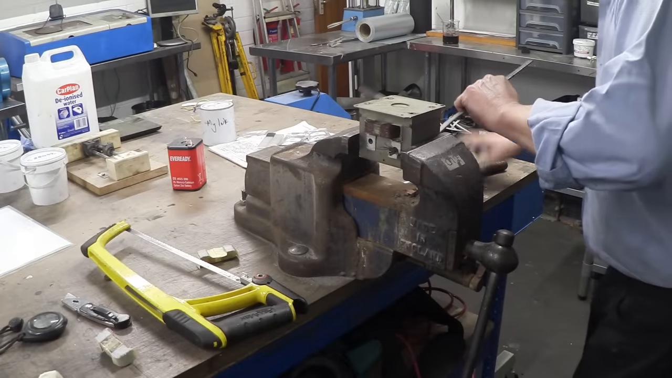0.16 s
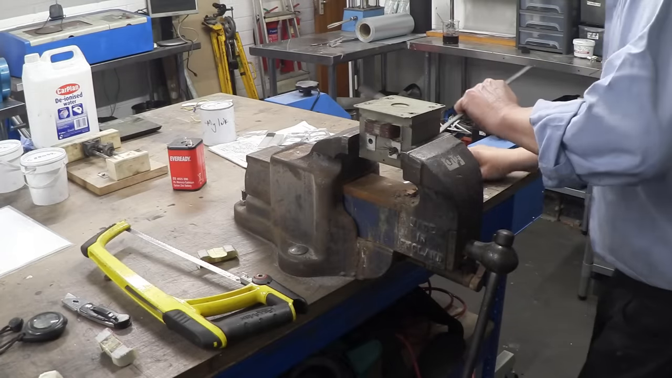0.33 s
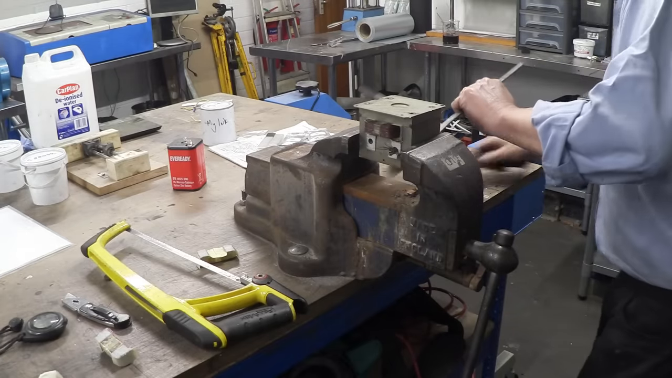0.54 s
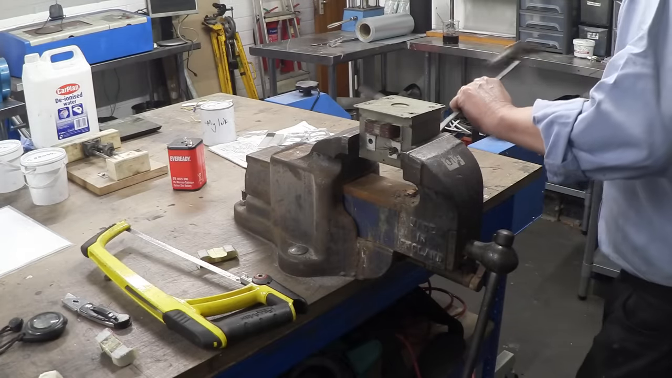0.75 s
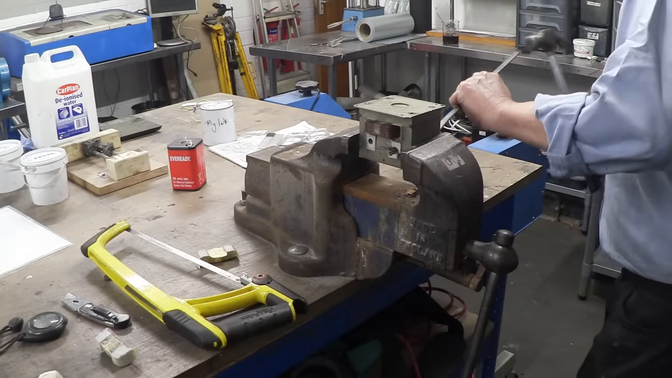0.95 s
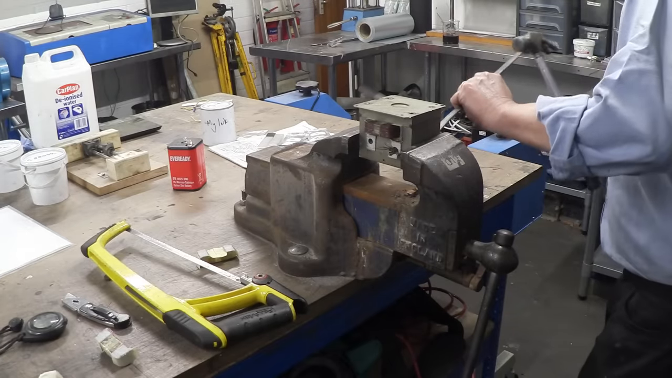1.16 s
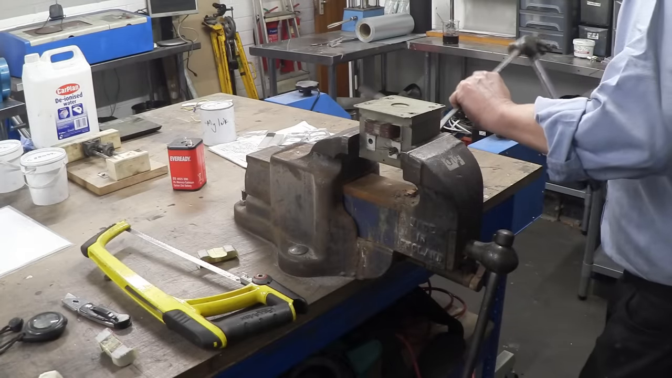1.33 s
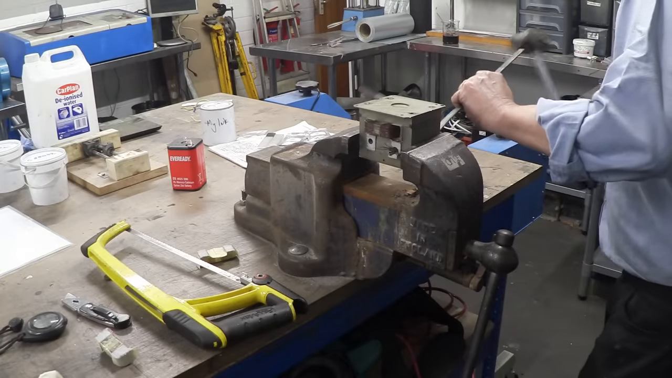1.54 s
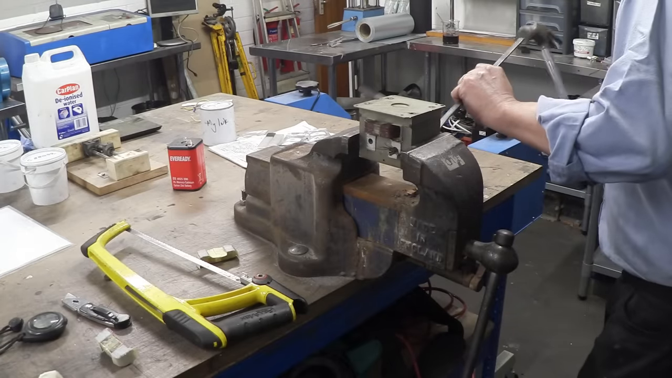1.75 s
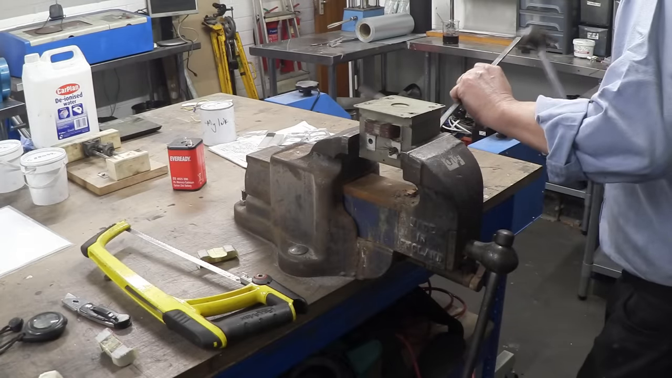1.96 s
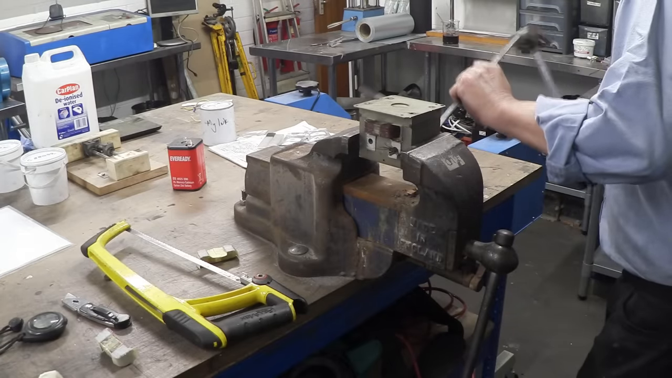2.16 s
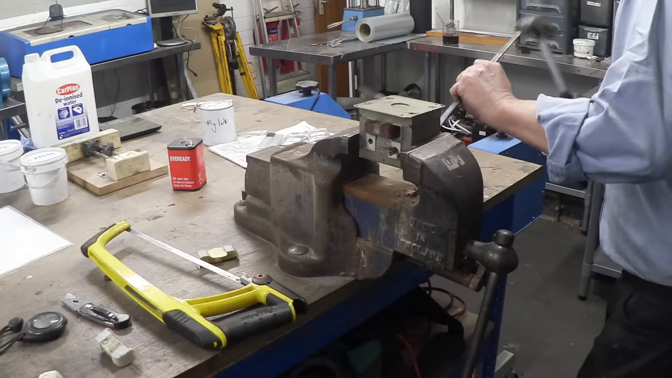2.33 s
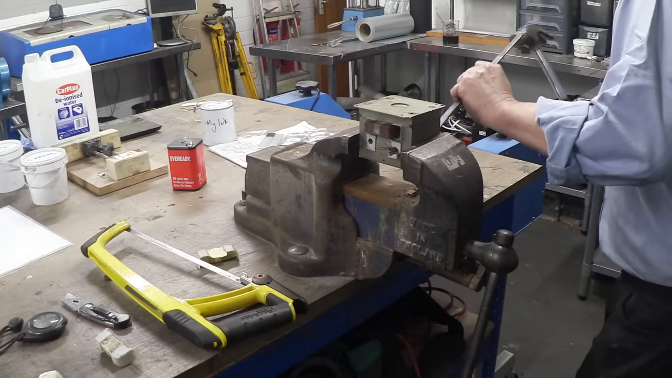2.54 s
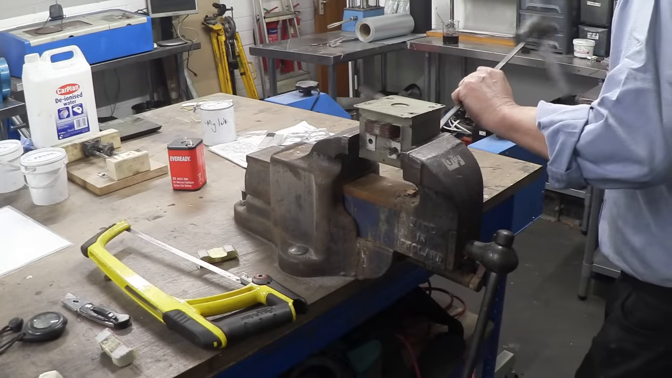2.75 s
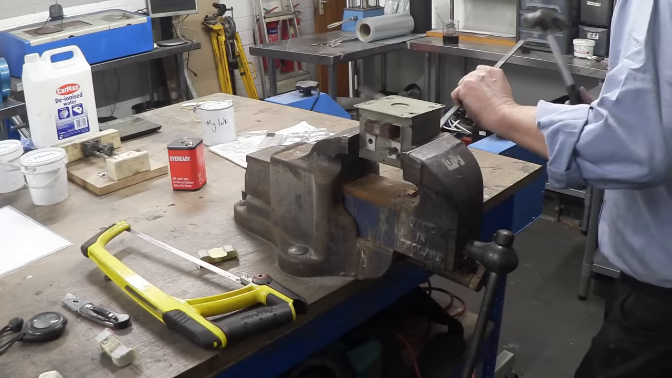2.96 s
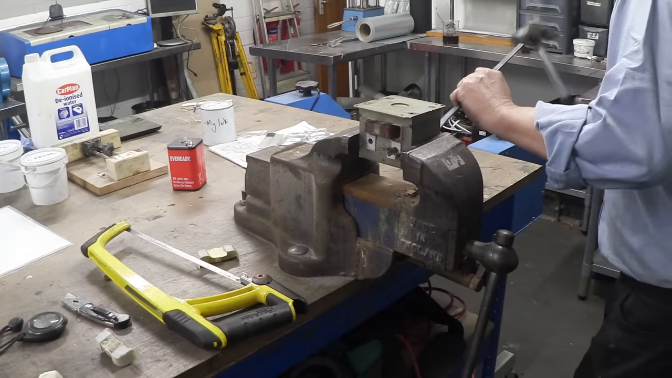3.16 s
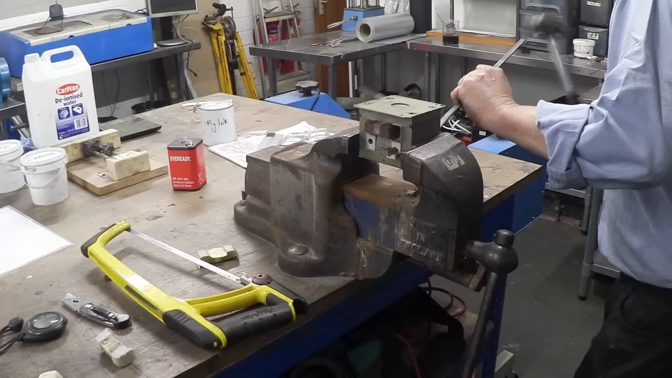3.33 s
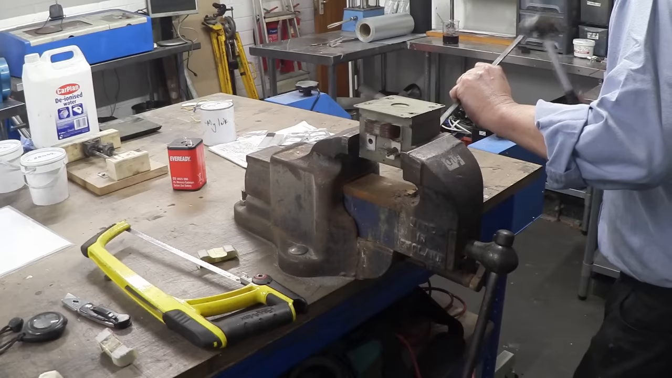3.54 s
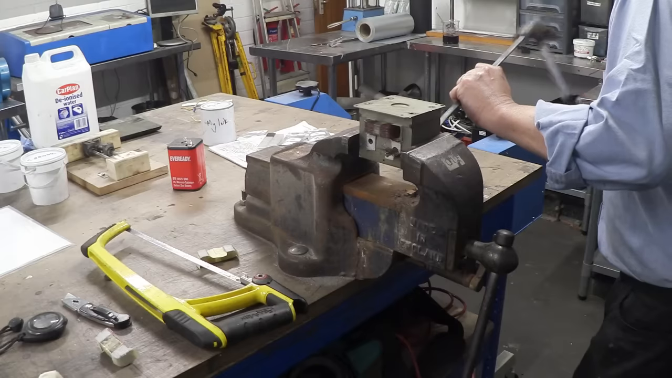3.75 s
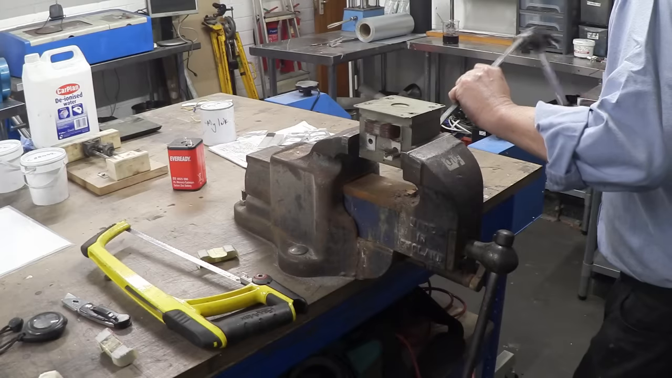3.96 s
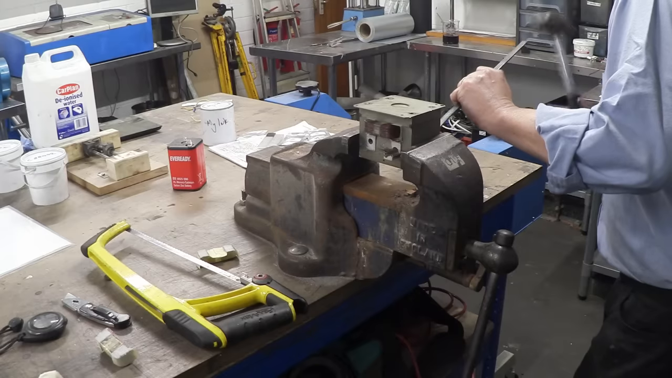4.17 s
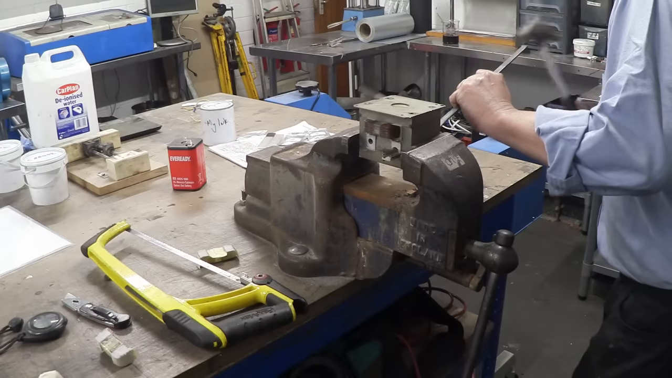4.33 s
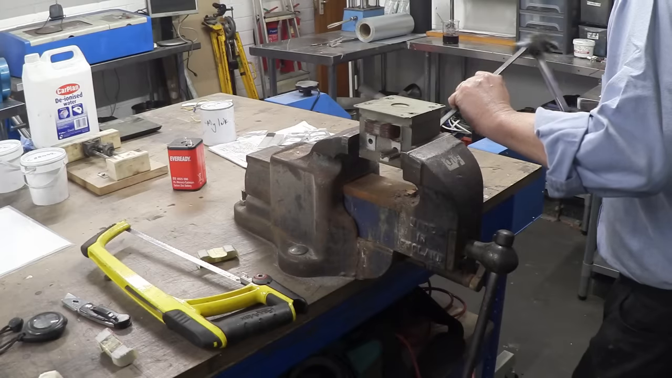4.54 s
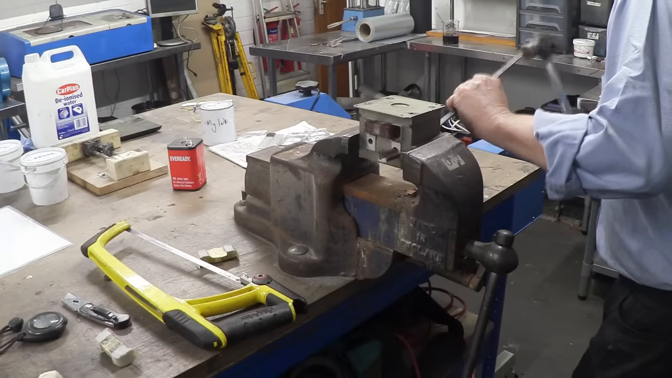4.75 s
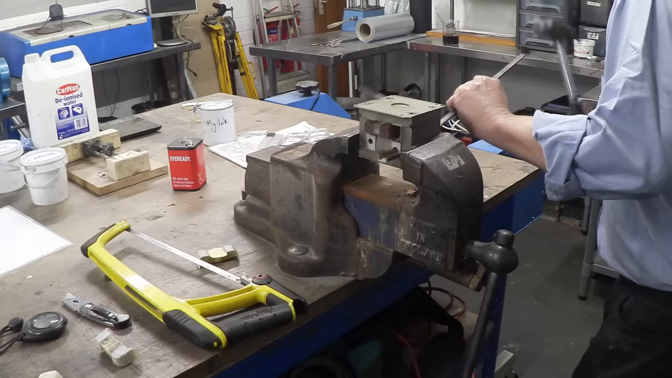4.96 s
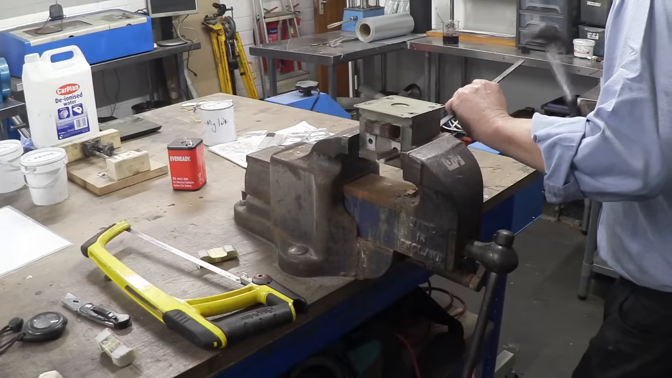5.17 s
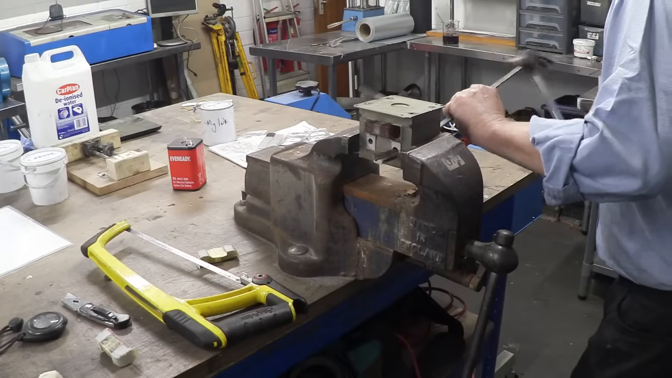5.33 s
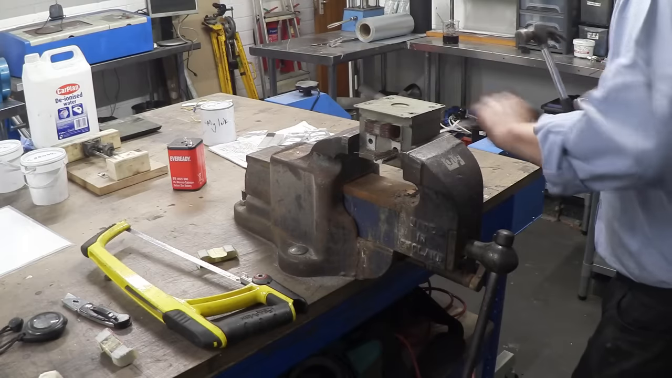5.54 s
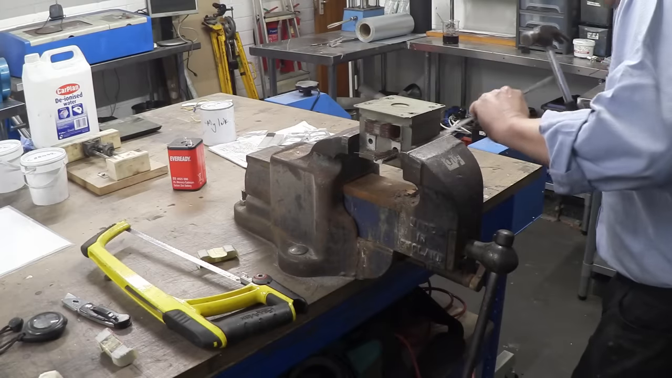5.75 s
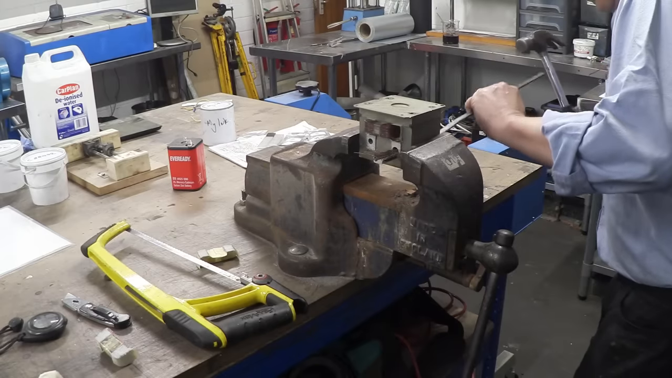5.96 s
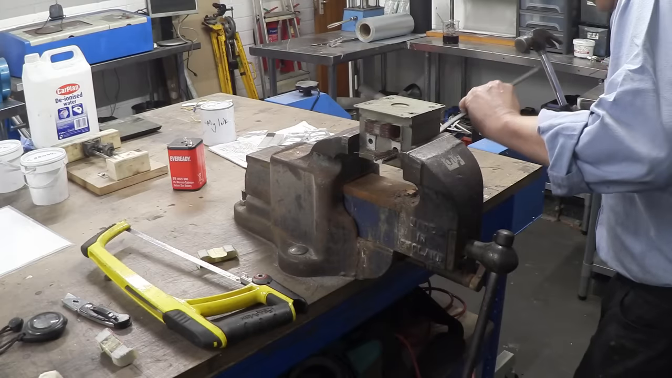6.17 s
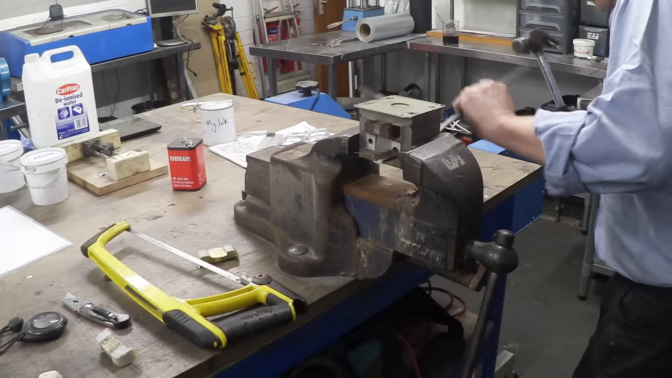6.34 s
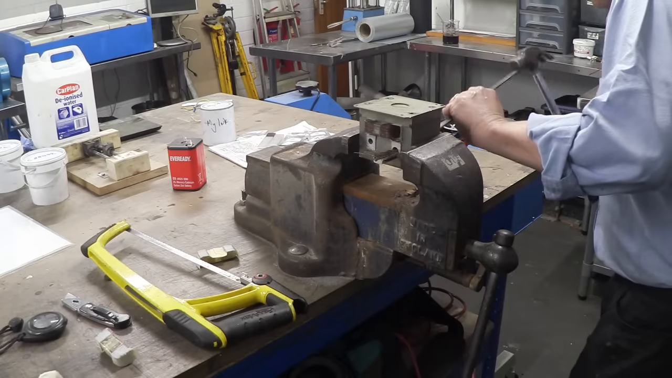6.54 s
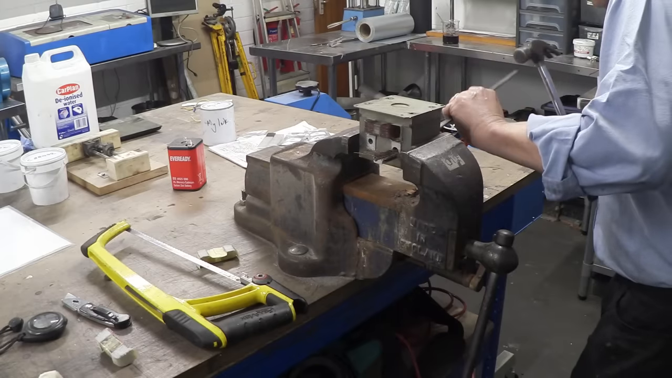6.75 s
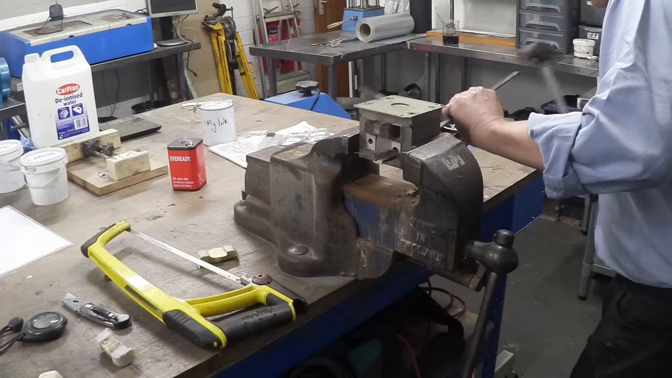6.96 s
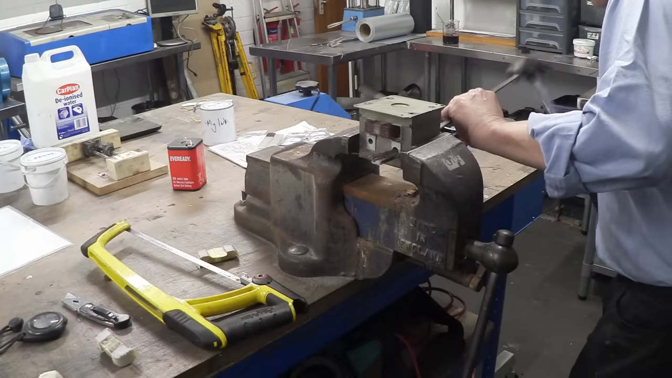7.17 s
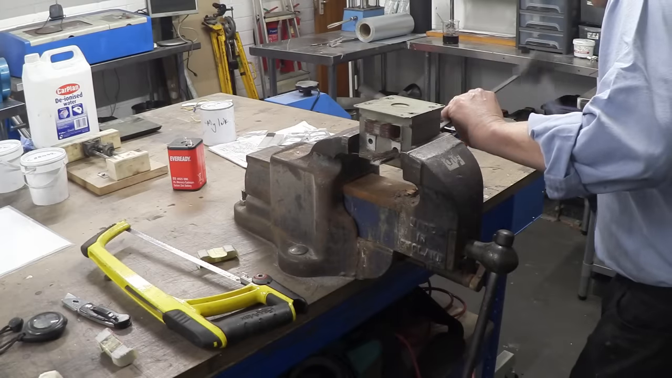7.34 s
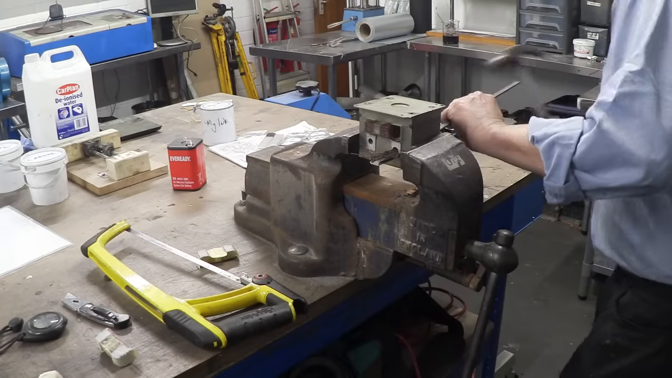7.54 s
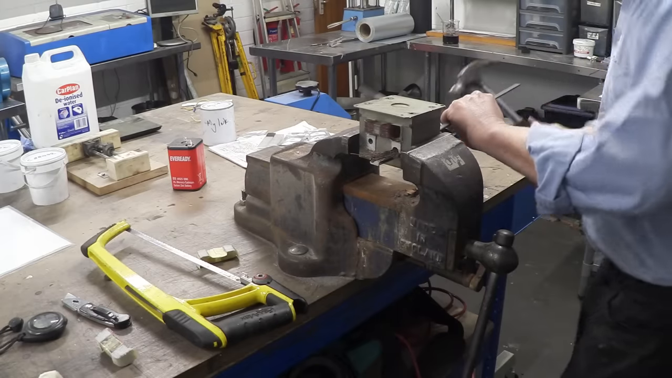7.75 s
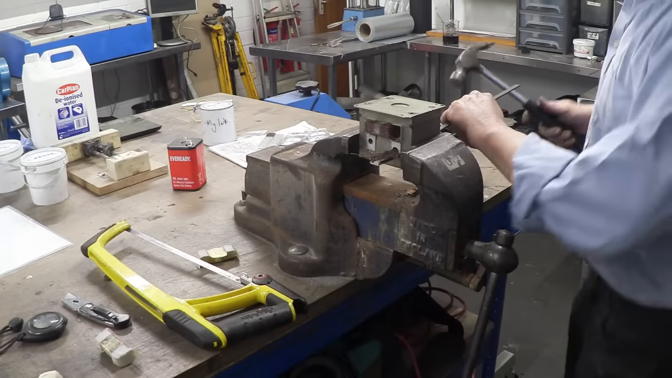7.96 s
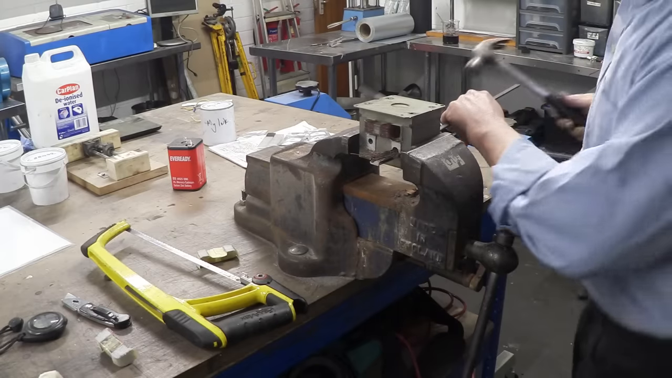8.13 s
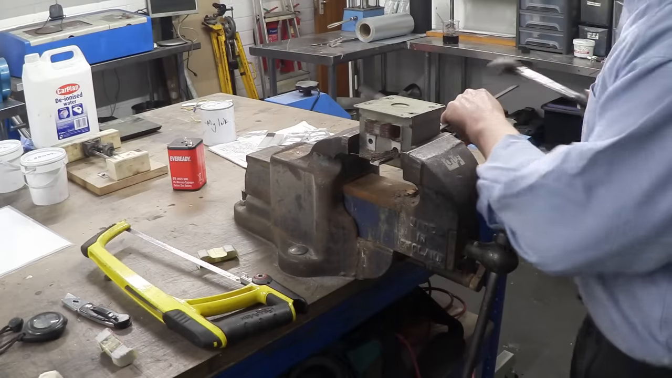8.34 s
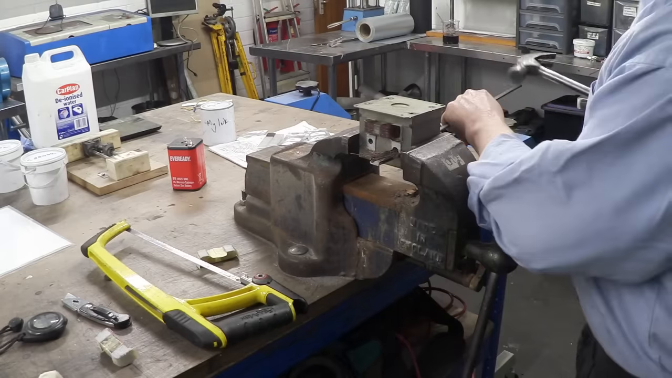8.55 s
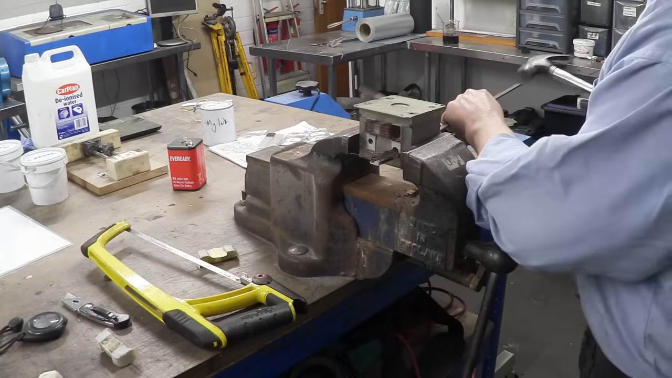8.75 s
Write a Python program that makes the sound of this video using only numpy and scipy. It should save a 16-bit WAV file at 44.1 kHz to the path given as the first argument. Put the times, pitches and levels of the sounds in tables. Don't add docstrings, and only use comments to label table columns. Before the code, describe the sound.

Close stereo sound, about a metre from a bench vice, with short room reflections and soft airy hum. Brief gritty drag and light aiming taps lead into a run of evenly spaced hammer cracks on steel, short choked rings with a dull wooden-metal thud beneath, growing louder and then holding. The run stops for small ticks and nudges; one lighter tap and three final whacks follow, then metal scraping, clicks and cloth rustling.

```python
import sys
import numpy as np
from scipy import signal
from scipy.fft import rfft, irfft
from scipy.io import wavfile
from scipy.ndimage import uniform_filter1d

SR = 44100
rng = np.random.default_rng(int(sys.argv[2]) if len(sys.argv) > 2 else 0)


def transcribe(u):
    v = np.clip(np.atleast_2d(u).T, -1, 1)
    q = np.round(v * 32767).astype(np.int16)
    wavfile.write(sys.argv[1], SR, q)


def level_to_linear(level):
    exponent = np.asarray(level, float) / 20
    return 10 ** exponent


N = 388080


def on_log(table, hz, column=1):
    table = np.array(table, float)
    return np.interp(np.log(np.maximum(hz, 1)), np.log(table[:, 0]), table[:, column])


def noise(size, spectrum):
    gain = level_to_linear(on_log(spectrum, np.fft.rfftfreq(size, 1 / SR)))
    x = irfft(rfft(rng.standard_normal(size)) * gain, size)
    return x / np.sqrt(np.mean(x ** 2))


def resonant_noise(size, power):
    return irfft(rfft(rng.standard_normal(size)) * np.sqrt(power), size)


def fade(t, t60):
    return np.exp(-np.log(1000) * t / np.maximum(t60, .002))


def flicker(rate, size=N):
    k = int(SR / rate)
    held = np.repeat(rng.standard_normal(size // k + 1), k)
    return uniform_filter1d(held, k)[:size]


def add(track, s, sound):
    i = int(s * SR)
    track[i:i + len(sound)] += sound[:N - i]


def played(rows, extra_db=0):
    t = np.arange(N) / SR
    extra_db = extra_db + np.zeros(len(rows))
    gain = 0
    for row, extra in zip(rows, extra_db):
        start, db, swell, fall = row[:4]
        gain = gain + level_to_linear(db + extra - 20 * np.maximum((start - t) / swell, (t - start) / fall))
    return gain


# pitch_hz, level_db (per Hz)
AIR_COLOUR = [(12, -39), (20, -10.5), (75, -7), (257, -4), (581, -12.5), (1430, -17), (11100, -26.5),
              (16400, -47)]
# start_s, level_db
AIR_DRIFT = [(0, 1.5), (1.2, -1.5), (5.5, 0), (6.3, -2), (8.8, 0.5)]


def air():
    drift_db = np.interp(np.arange(N) / SR, *np.transpose(AIR_DRIFT)) + 0.37 * flicker(8.7)
    narrowing = [(40, -24.5), (200, -19), (900, -7.0)]
    side_colour = [(hz, db + on_log(narrowing, hz)) for hz, db in AIR_COLOUR]
    mid = noise(N, AIR_COLOUR)
    side = level_to_linear(-7.5) * np.outer([1, -1], noise(N, side_colour))
    return level_to_linear(-58 + drift_db) * (mid + side)


# pitch_hz, left_right_likeness (0-1)
LIKENESS = [(120, .998), (250, 0.83), (600, 0.93), (1100, 0), (2200, 0.5), (4000, 0.48), (8000, 0.7),
            (15000, .45)]


def spread(mid, side):
    alike = np.clip(on_log(LIKENESS, np.fft.rfftfreq(len(mid), 1 / SR)), 0, 1)
    m = rfft(mid) * np.sqrt((1 + alike) / 2)
    d = rfft(side) * np.sqrt((1 - alike) / 2)
    return irfft([m + d, m - d], len(mid))


# pitch_hz, t60_s, level_db
TAIL_BANDS = [(316, 0.039, -10), (733, 0.35, -5), (1600, 0.26, -8.5), (3830, 0.37, -19),
              (8400, 0.29, -11.5), (14800, 0.19, -7)]
# start_s, level_db (over the tail), width_s
WALLS = [(.0115, 7.5, 0.0028), (.0195, 5, 0.00084), (0.016, 3.5, 0.0011), (.033, 7.5, 0.0047),
         (0.031, 1.5, 0.018)]


def room(dry):
    t = np.arange(SR // 2) / SR
    log_hz = np.log(np.fft.rfftfreq(len(t), 1 / SR) + 1)
    centres = np.log(np.array(TAIL_BANDS)[:, 0])
    tail = 0
    for k, (_, t60, db) in enumerate(TAIL_BANDS):
        share = np.interp(log_hz, centres, np.arange(len(TAIL_BANDS)) == k)
        band = irfft(rfft(rng.standard_normal((2, len(t)))) * np.sqrt(share), len(t))
        tail = tail + level_to_linear(db) * fade(t, t60) * band
    clumps_db = sum(db * np.exp(-((t - s) / width) ** 2) for s, db, width in WALLS)
    build = 1 - np.exp(-(t * 100) ** 2)
    response = spread(*tail) * level_to_linear(-24 + clumps_db) * build
    response[:, 0] += 1
    response[:, 40:43:2] += .28 * np.outer([1, -1], [1, -1])
    return signal.fftconvolve(dry[None], response, axes=1)[:, :N]


# start_s, level_db, swell_s, fade_s
SLEEVE = [
    (8.27, -50.5, 0.042, 0.093),
    (8.39, -47, 0.066, 0.28),
    (8.67, -47.5, 0.099, 0.26),
    (8.765, -45, 0.14, 0.014),
]
# pitch_hz, level_db (per Hz)
CLOTH = [(290, -37), (500, -7), (988, -6), (1060, -12), (1740, -3), (6140, -6), (8830, -7), (16000, -30)]
# start_s, level_db, swell_s, fade_s
FABRIC = [(0.4, -68.5, 1.5, 2.5)]


def rustle():
    cloth = noise(N, CLOTH) * level_to_linear(2.0 * flicker(90) + 1.5 * flicker(600))
    fabric = noise(N, [(8000, -24.5), (12000, 2.0), (16000, -7.0)])
    return played(SLEEVE) * cloth + played(FABRIC) * fabric


# start_s, level_db, swell_s, fade_s, dust_db (over grit)
SCRAPES = [(0.315, -36, 0.0057, 0.026, -17), (0.366, -34, 0.03, 0.034, -16), (0.44, -52, 0.091, 0.15, -5.5),
           (0.53, -55.5, 0.045, 0.14, -11), (0.66, -63, 0.22, 1, -5), (6.494, -45, 0.045, 0.026, -9),
           (6.556, -52.5, 0.027, 0.084, -8), (7.704, -46.5, .07, 0.027, -2), (8.043, -51, .004, 0.055, -8),
           (8.062, -46, 0.027, 0.04, -11), (8.1, -46.5, 0.021, 0.026, -4)]
# pitch_hz, level_db (per Hz)
GRIT = [(600, -21), (1100, -4), (2000, -2), (2800, -1.5), (3300, -2), (4100, -1), (5200, -6.5),
        (16000, -48.5)]
# start_s, level_db, swell_s, fade_s
HUMS = [(0.315, -45, 0.0044, 0.17), (0.45, -42.5, 0.028, 0.24), (0.515, -47.5, 0.11, 0.059),
        (6.53, -54, 0.097, 0.27), (5.6, -58, 0.16, 0.67), (7.64, -59, .03, 0.44), (8.08, -59, .2, 0.29)]


def scrapes():
    grit = noise(N, GRIT) * level_to_linear(4.6 * flicker(400))
    hum = noise(N, [(90, -28.0), (190, -11), (255, -2.0), (320, -18.5), (520, -20), (900, -32.5), (3000, -79)])
    dust = noise(N, [(3500, -19.5), (7000, 1.5), (11500, -8.5), (16000, -22.0)]) * level_to_linear(2.3 * flicker(150))
    dust_db = np.array(SCRAPES)[:, 4]
    return played(SCRAPES) * grit + played(HUMS) * hum + played(SCRAPES, dust_db) * dust


# start_s, level_db, swell_s, fade_s
DRAG = [
    (8.2, -53.5, 0.088, 0.62),
    (8.5, -53.5, 0.37, 0.16),
]
# pitch_hz, width_hz, level_db
DRAG_RINGS = [(824, 50, 3.5), (1400, 48, 1), (1670, 71, -2), (2490, 42, 0.5), (2880, 400, -2),
              (3900, 54, -2)]


def bar_slide():
    f = np.fft.rfftfreq(N, 1 / SR)
    power = sum(level_to_linear(db) ** 2 / (1 + ((f - hz) / width * 2) ** 2) for hz, width, db in DRAG_RINGS)
    drag = resonant_noise(N, power)
    return played(DRAG) * drag / np.std(drag) * level_to_linear(2.3 * flicker(50))


def handling():
    return level_to_linear(-3.0) * (scrapes() + rustle() + bar_slide())


# start_s, level_db, pitch_hz, relative_width
TICKS = [(.351, -42, 2200, .6), (.317, -40, 3000, 1), (0.36, -42, 3280, .3), (.366, -34, 1790, 0.27),
         (.369, -45, 4100, .25), (.372, -47, 2360, .5), (.384, -49, 1800, .4), (.51, -46, 1106, 0.25),
         (0.528, -46, 2460, 0.15), (.537, -47.5, 2490, .3), (1.803, -48, 9000, 0.67),
         (4.742, -32.5, 6950, 0.4), (4.803, -43, 6900, 0.317), (5.652, -51, 9000, 0.41),
         (8.177, -52, 11000, .5), (5.71, -45, 6600, 0.18), (5.848, -45, 6800, 0.12),
         (5.99, -55, 4330, 0.16), (6.496, -44, 3500, 0.36), (6.53, -56, 7300, 0.18),
         (6.55, -55, 7150, 0.06), (5.65, -58, 10700, .05), (8.01, -49, 8100, 0.22),
         (8.042, -46, 2300, 0.53), (8.092, -31.5, 3020, 0.72), (8.099, -32.5, 3240, 0.77),
         (8.105, -34, 3300, 0.71), (8.121, -44, 824, 0.67), (8.311, -43, 6600, 0.22), (8.031, -60, 278, .4),
         (8.06, -44.5, 2100, 0.17), (8.078, -52, 320, 0.5), (8.467, -49.5, 830, 0.51),
         (8.518, -50, 260, 0.44), (8.685, -58, 550, .25), (8.725, -49, 1780, 0.18), (8.757, -42, 6040, 0.6),
         (8.766, -37, 7000, 0.33)]


def ticks():
    out, t = np.zeros(N), np.arange(SR // 8) / SR
    for s, db, hz, width in TICKS:
        step = (1 + width) ** 2
        colour = [(hz / step, -25), (hz, 0), (hz * step, -25), (hz * (1 + width) ** 4, -50)]
        add(out, s, level_to_linear(db) * noise(len(t), colour) * fade(t, 18 / hz / width))
    return out


# pitch_hz, level_db, t60_s
BOARD = [(82.5, -6.5, 0.36), (100.4, -13, 0.47), (159.8, -7, .25), (189, -5, 0.3), (212.1, -4, 0.34),
         (246.5, -8, 0.54), (342.4, -10, 0.16), (384, -8.5, 0.22), (438, -6, 0.38), (457.5, -6, 0.19),
         (491.5, -9, 0.17), (529.8, -4.5, 0.17), (750.5, -13, 0.2), (836, -15.5, 0.19)]


def board(deep_db, knock_db, core_db, t60_share):
    t = np.arange(SR // 2) / SR
    hz, db, t60 = np.transpose(BOARD)[:, :, None]
    blow_db = np.where(hz < 130, deep_db + 8.5, knock_db + core_db * (hz > 600))
    db = db + blow_db + 0.66 * rng.standard_normal(hz.shape)
    build = 1 - np.exp(-t * hz / 2.7)
    return (level_to_linear(db) * fade(t, t60 * t60_share) * build * np.sin(2 * np.pi * hz * t)).sum(axis=0)


# pitch_hz, width_hz, level_db
BENCH = [(81.5, 9.6, -4.5), (100, 32, -6), (151, 39, -7), (204, 120, -5.5), (260, 4.2, -4), (351, 130, -5),
         (402, 41, -6), (455, 66, 0), (524, 24, -5), (690, 93, -19.5), (764, 43, -14), (1030, 46, -17.5)]


def thump(deep_db, knock_db, core_db, t60_share):
    t = np.arange(SR // 2) / SR
    f = np.fft.rfftfreq(len(t), 1 / SR)
    bands = [  # low_hz, high_hz, level_db, t60_s
        (0, 130, deep_db - 5.5, 0.59), (130, 300, knock_db, 0.63),
        (300, 600, knock_db, 0.33), (600, 2000, knock_db + core_db - 10.5, 0.22)]
    thud = 0
    for low_hz, high_hz, db, t60 in bands:
        power = sum(level_to_linear(d) ** 2 / (1 + ((f - hz) / width * 2) ** 4)
                    for hz, width, d in BENCH if low_hz < hz < high_hz)
        rumble = resonant_noise(len(t), power)
        thud = thud + level_to_linear(db) * fade(t, t60_share * t60) * rumble / np.std(rumble[:SR // 14])
    swell = 1 - np.exp(-t / 0.0053)
    return level_to_linear(-10.0) * swell * thud + level_to_linear(-1.5) * board(deep_db, knock_db, core_db, t60_share)


ECHO_S = .0055


def clack(t, sizzle_db):
    colour = [(500, -45), (1500, -16), (4500, 0), (9000, sizzle_db - 4), (13000, sizzle_db - 10), (16000, -22)]
    return noise(len(t), colour) * fade(t, .008)


def ring(hz, db, t60, t, scatter_db):
    split = .035
    chance = rng.standard_normal((len(hz), 3))
    turn = 2 * np.pi * hz[:, None] * t
    lower = np.sin(turn * (1 - split / 2) + chance[:, 1:2])
    upper = np.sin(turn * (1 + split / 2) + chance[:, 2:])
    level = level_to_linear(db - 3.5 + scatter_db * chance[:, 0])[:, None]
    return (level * fade(t, t60[:, None]) * (lower + upper)).sum(axis=0)


RING_REF_HZ = 3000
# pitch_hz, level_db (per Hz)
CRACK = [(180, -47), (320, -14), (1220, -16), (2000, -3), (3760, 0.5), (8120, -11), (12300, -17.5),
         (16400, -58.5)]


def steel(hz, db, colour, t, rise_s):
    t60 = 0.014 * (RING_REF_HZ / hz) ** 0.35
    bar = ring(hz, db, t60, t, scatter_db=1.0)
    clang_width, clang_db, clang_s = .085, -14.5, .11
    f = np.fft.rfftfreq(len(t), 1 / SR)[:, None]
    power = (level_to_linear(db) ** 2 / hz / (1 + ((f / hz - 1) / clang_width * 2) ** 4)).sum(axis=1)
    clang = resonant_noise(len(t), power)
    clang = clang / np.std(clang) * level_to_linear(3.0 * flicker(300, size=len(t))) * fade(t, clang_s)
    hiss = noise(len(t), [(f, d + on_log(colour, f)) for f, d in CRACK])
    crack = fade(t, .018)
    chatter = level_to_linear(5.9 * flicker(700, size=len(t))) * fade(t, 0.25)
    bright = hiss * (level_to_linear(-5.5) * crack + level_to_linear(-23.5) * chatter)
    return (level_to_linear(-4.0) * bar + level_to_linear(clang_db) * clang + bright) * (1 - np.exp(-t / rise_s))


# start_s, level_db, bench_db, rise_s, clack_db
TAPS = [(0.317, -36.5, 2, 0.00036, -9), (1.354, -27, -1, 0.00024, -6), (1.671, -25, -48, 0.0049, -10),
        (1.784, -26.5, -45, 0.00042, 4), (6.669, -24.5, -7, 0.00081, -10), (5.574, -31, -22, 0.0064, -30),
        (6.229, -44, -15, 0.0026, -30), (6.485, -43.5, -3, .012, -28)]
# pitch_hz, level_db
TAP_RINGS = [
    [(1790, 5), (2670, -9), (3110, -18), (4250, -11), (5260, -6)],
    [(1800, 2.5), (2134, 0.5), (2570, 1), (3920, 4), (4250, 3.5), (7650, -3.5), (9300, -4)],
    [(1440, -6), (2250, -4), (3030, -7.5), (3800, -6), (5320, -4), (7380, -15), (9620, -12)],
    [(3030, -17), (4000, 0.5), (4500, -16.5), (4870, 2.5), (5300, -2), (7600, -1), (10280, -2)],
    [(1420, -17), (1894, -2.5), (2580, 4), (2820, -7.5), (3750, -18), (4490, 1), (8400, 1.5), (8900, -2),
     (10800, -7)],
    [(1430, -2), (2250, -5), (2700, -6), (3500, -10), (7150, 0)],
    [(1470, 0), (2600, -4), (3300, -10), (4150, -6), (7200, -6)],
    [(1450, -5), (2500, 5), (3400, -3), (4350, 0), (7150, 8), (8450, 2)],
]


def taps():
    out, t = np.zeros(N), np.arange(SR // 8) / SR
    colour = [(5000, 9.0), (12000, -1.0)]
    for (s, db, bench_db, rise_s, clack_db), rings in zip(TAPS, TAP_RINGS):
        hz, ring_db = np.transpose(rings)
        ring_db = ring_db - ring_db.max() + on_log(colour, hz)
        add(out, s, level_to_linear(db) * steel(hz, ring_db, colour, t, rise_s))
        add(out, s + ECHO_S, level_to_linear(db + clack_db) * clack(t, sizzle_db=-9.5))
        add(out, s, level_to_linear(db) * thump(bench_db - 7.0, bench_db, core_db=-3.5, t60_share=0.57))
    return out


# start_s, peak_db, core_db, sizzle_db, knock_db (bench)
BLOWS = [(1.954, -7, -12.5, -19, -20), (2.2378, -5, -6.5, -13.5, -20.5), (2.5612, -4, -9.5, -13, -19.5),
         (2.8647, -2.5, -14, -13, -18.5), (3.1523, -2.5, -19, -8.5, -22.5), (3.46, -0.5, -27.5, -10, -25.5),
         (3.743, -1, -27, -9.5, -27), (4.0273, 0, -23.5, -9.5, -28), (4.302, 0.5, -26.5, -11.5, -30),
         (4.575, 0.5, -22.5, -10, -30.5), (4.8418, 0, -17.5, -5, -25.5), (5.1093, -1, -14.5, -7.5, -23),
         (5.3652, 0, -16.5, -7.5, -26.5), (6.922, -10.5, -7.5, -7.5, -23), (7.1787, -2.5, -18.5, -7.5, -28),
         (7.4316, -2.5, -18.5, -2.5, -27)]
SEAT_CHANGES_S = [2.1, 2.7, 3.3, 4.15, 4.45, 5.0, 6.0, 7.0]
SEAT_CLACK_DB = [-5, -0.5, -3, -9, -6, -8.5, -5, -1.5, 0.5]
# pitch_hz, level_db
TIGHT = [
    [(1440, -9.5), (2270, -13.5), (3260, 7), (3930, -12), (4860, 1), (5560, 1.5), (7260, -27), (7620, -15),
     (8780, -18.5), (9540, -10.5), (10110, -6.5), (11280, -18), (13240, -30)],
    [(1480, -4), (2260, -4.5), (3040, -3.5), (3980, 1.5), (4440, -10.5), (5780, -3.5), (7000, -10),
     (7510, -8), (8400, -7), (9180, -10.5), (9750, -10.5), (10120, -6), (10930, -16)],
    [(1460, -12.0), (3000, -1), (3920, 3), (4930, -4), (5740, -1.5), (6850, -18.5), (8180, -6.5),
     (9140, -10.5), (10120, -6.5), (10900, -11), (11660, -12.5), (12840, -23.5)],
    [(1420, -12.5), (2590, 1.5), (3020, -14.5), (3440, -8.5), (3900, -1.5), (4380, -3.5), (4720, -0.5),
     (5600, -2.5), (6860, -12.5), (7830, -6.5), (9140, -2), (11400, -20), (13250, -15)],
]
SLIDING = [
    [(1430, -6.5), (2300, -5), (3010, -6), (4240, 6), (4880, -8.5), (5580, -2), (6880, -14.5),
     (7440, -10.5), (8220, -1.5), (10100, -1.5), (10900, -15.5), (11580, -19), (12750, -12.5)],
    [(1440, -8.5), (2660, -2.5), (3020, -4), (3740, 2.5), (4260, -3.5), (4920, 2.5), (6860, -12.5),
     (8060, 1), (9590, -7), (10130, -8), (10680, -4.5), (11900, -13.5), (13030, -14)],
    [(1430, -7), (2300, -12), (3010, -7.5), (3710, 1.5), (5940, -4), (6920, -12), (8010, -4.5),
     (10040, -8.5), (10720, -11.5), (11240, -17), (11920, -17.5), (12180, -14), (12680, -17)],
    [(1420, -16.5), (2280, -14), (3700, -1), (4320, -1.5), (5530, -1.5), (6900, -13), (7990, 2.5),
     (9050, -9), (10090, -7), (10900, -12), (11300, -12.5), (12240, -14.5), (13040, -20.5)],
    [(1430, -9.5), (2620, -6.5), (3380, -0.5), (4960, -0.5), (5930, -3.5), (7530, -5.5), (8060, -2.5),
     (8700, -7.5), (9460, -5.5), (10260, -7), (11310, -9.5), (11880, -10), (12860, -14)],
    [(1440, -5), (3240, 4), (3820, -1.5), (4730, -3.5), (5540, -1.5), (6980, -13.5), (7990, -2.5),
     (9520, -4.5), (10220, -7), (10890, -14), (11300, -11), (11720, -11), (12660, -16)],
    [(1420, -6.5), (2280, 0), (3180, -3), (3740, -1.5), (4360, -5.5), (5260, -3), (7540, -5.5),
     (8190, -7.5), (9340, -4), (9920, -4.5), (10580, -12), (12230, -12), (12920, -14)],
    [(1420, -6), (2140, -4), (2520, 1), (3200, -4), (3800, 1), (7090, -6.5), (8220, -4.5), (9330, -1),
     (10050, -8.0), (10710, -10), (11560, -19), (12400, -14), (13110, -14)],]
FREE = [
    [(1840, -4.5), (2140, 3), (3490, -5.0), (3870, 1), (5200, -2.5), (6900, -16.5), (7260, -12), (7680, -9),
     (8740, -10.5), (9240, -5), (10120, -5.5), (11440, -19.5), (12040, -19)],
    [(1860, 3), (2640, -8.5), (3480, -3), (4720, 4), (5540, -2), (6720, -6.5), (7900, -18.5), (9500, -7),
     (9840, -12), (10400, -14), (11220, -8.5), (12380, -9.5)],
    [(1440, -7.5), (1860, -2), (2240, 2.5), (2560, -3), (4040, 2.5), (5360, 3), (6710, -5.0), (7460, -6),
     (8790, -6.5), (9280, -7), (10140, -6), (10840, -8.5), (11400, -10.5)],
    [(1420, -5), (1850, -1.5), (2550, 2), (3860, 2.5), (4680, 2.5), (5360, 3.5), (6530, -6), (7420, -4.5),
     (8770, -4.0), (9320, -9.5), (10150, -4.5), (11400, -8.5), (12780, -12.5)],
]


def blows():
    out, t = np.zeros(N), np.arange(SR // 5) / SR
    usual = np.mean(BLOWS, axis=0)
    for (s, db, core_db, sizzle_db, knock_db), rings in zip(BLOWS, TIGHT + SLIDING + FREE):
        core_db, sizzle_db = core_db - usual[2], sizzle_db - usual[3]
        colour = [(500, 0), (750, core_db), (1100, core_db), (1800, 0), (5000, 0), (8500, sizzle_db)]
        hz, ring_db = np.transpose(rings)
        ring_db = ring_db + 1.5 * np.log2(hz / RING_REF_HZ)
        hit = steel(hz, ring_db, colour, t, rise_s=.0004)
        add(out, s, level_to_linear(db) * hit)
        echo = 0.43 * hit * fade(t, 0.032) + level_to_linear(-3.0) * clack(t, sizzle_db)
        seat = np.searchsorted(SEAT_CHANGES_S, s)
        add(out, s + ECHO_S, level_to_linear(db + SEAT_CLACK_DB[seat]) * echo)
        deep_db = -29.5 - 0.27 * db
        add(out, s, level_to_linear(db) * thump(deep_db, knock_db, core_db, t60_share=0.85))
    return out


def scene():
    bass_cut = signal.butter(6, 68, "high", fs=SR, output="sos")
    bench = signal.sosfilt(bass_cut, handling() + ticks() + taps() + blows())
    return room(bench) + air()


def band_limit(x):
    return signal.sosfilt(signal.butter(12, 16300, fs=SR, output="sos"), x)


# pitch_hz, left_minus_right_db
LEAN = [(1000, -0.5), (4000, 0), (8000, -2), (15000, -1.5)]


def record(dry):
    lean = level_to_linear(np.outer([.5, -.5], on_log(LEAN, np.fft.rfftfreq(N, 1 / SR))))
    x = np.tanh(1.424 * irfft(rfft(dry) * lean, N)) / 1.169
    x = signal.sosfilt(signal.butter(2, 28., "high", fs=SR, output="sos"), x)
    x = signal.sosfilt(signal.cheby1(8, 1, 15600, fs=SR, output="sos"), x)
    return band_limit(x)


dry = scene()
out = record(dry)
transcribe(out)
```